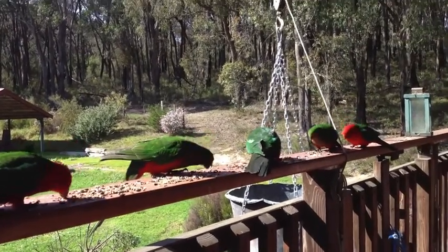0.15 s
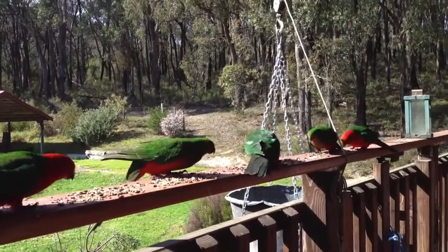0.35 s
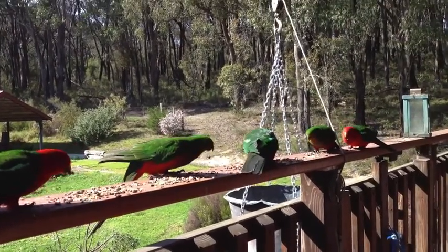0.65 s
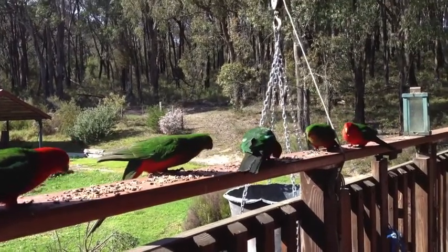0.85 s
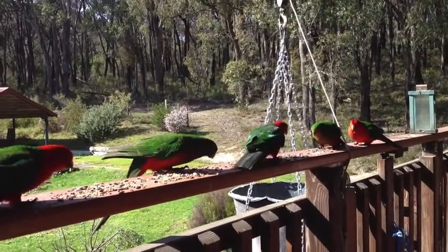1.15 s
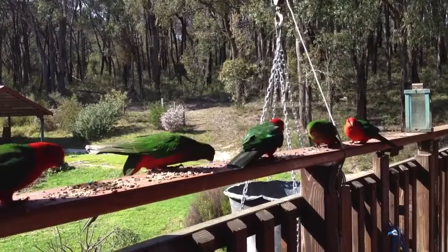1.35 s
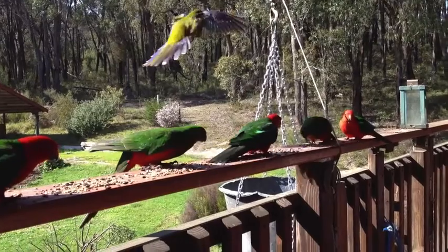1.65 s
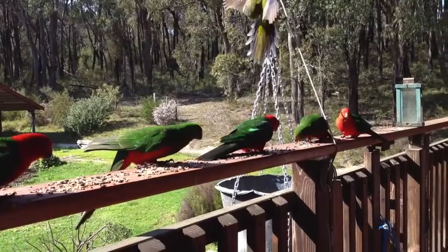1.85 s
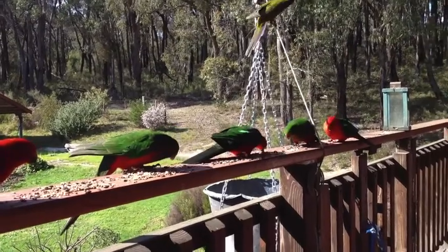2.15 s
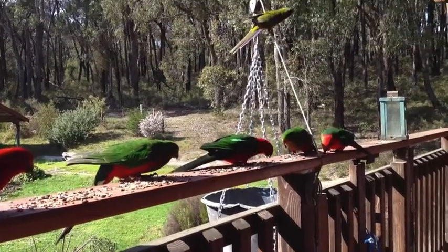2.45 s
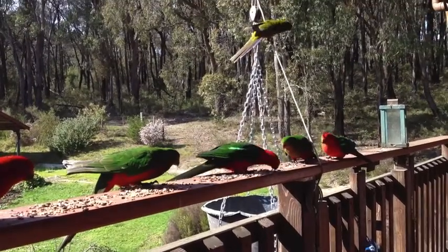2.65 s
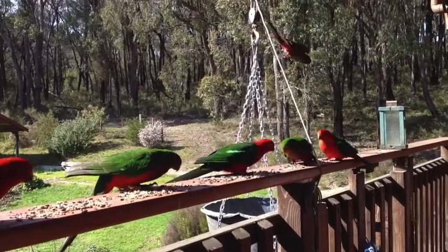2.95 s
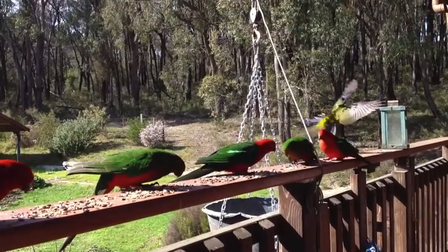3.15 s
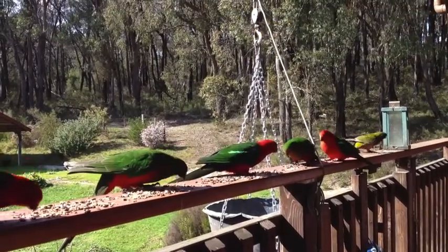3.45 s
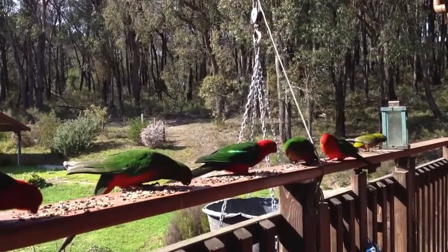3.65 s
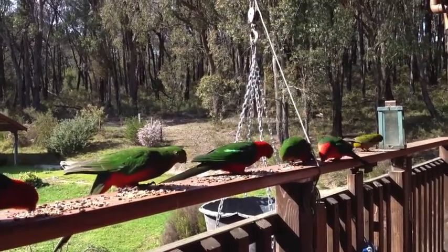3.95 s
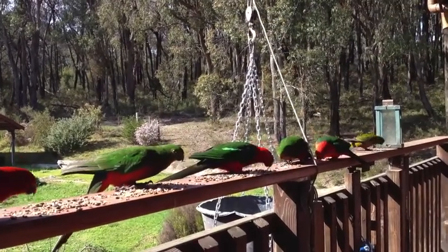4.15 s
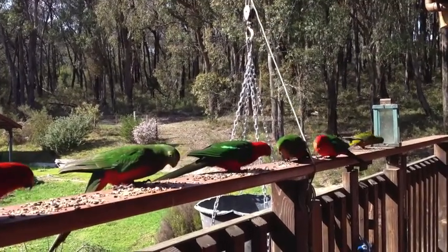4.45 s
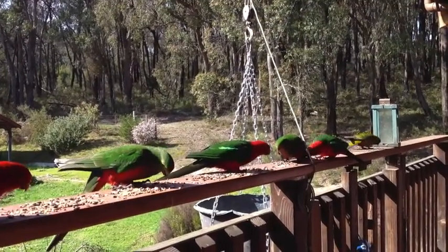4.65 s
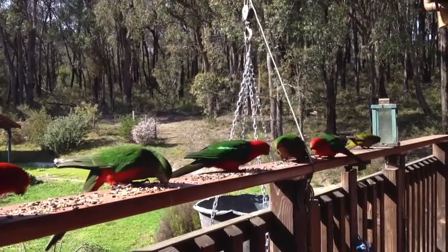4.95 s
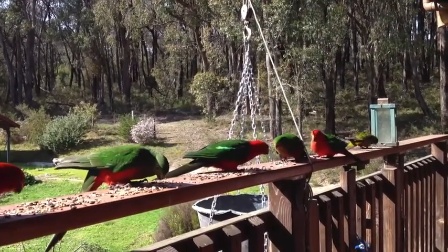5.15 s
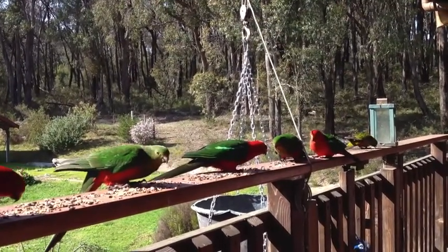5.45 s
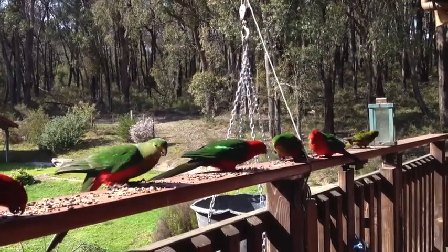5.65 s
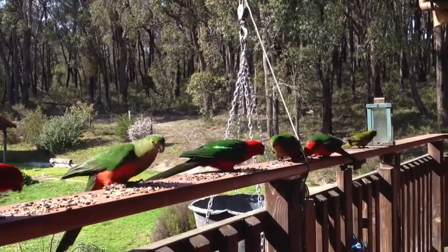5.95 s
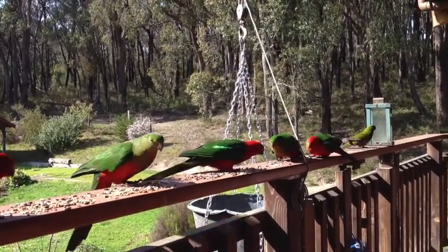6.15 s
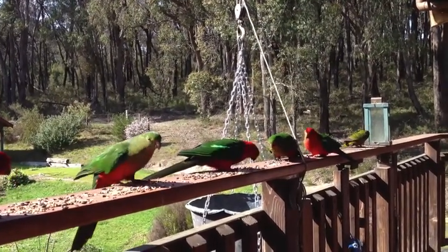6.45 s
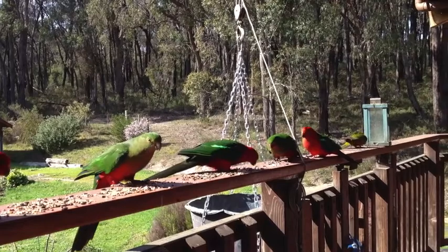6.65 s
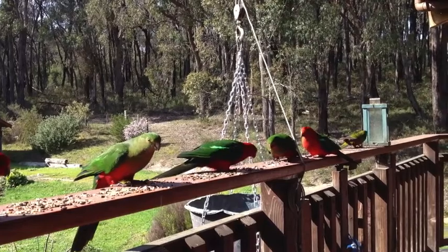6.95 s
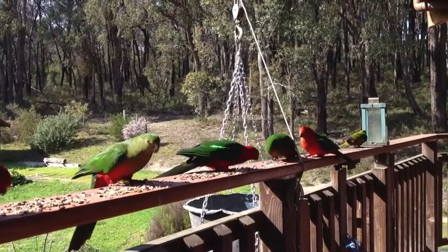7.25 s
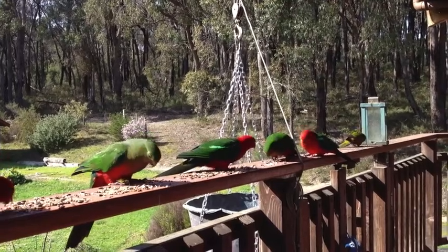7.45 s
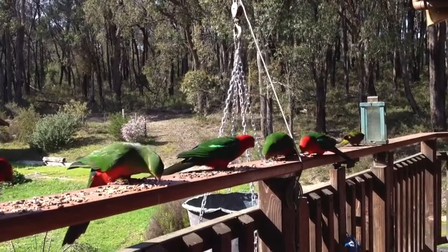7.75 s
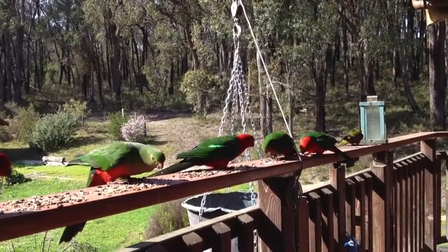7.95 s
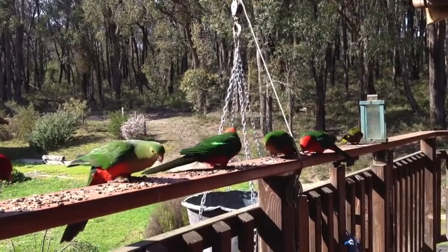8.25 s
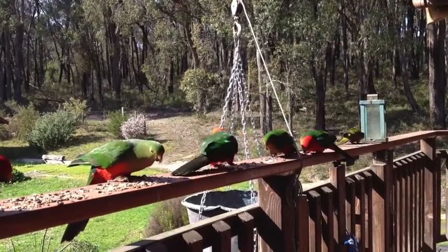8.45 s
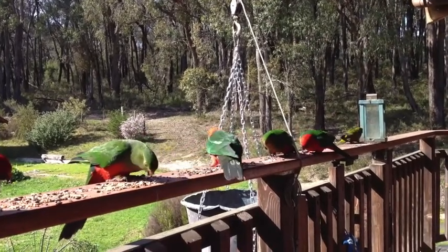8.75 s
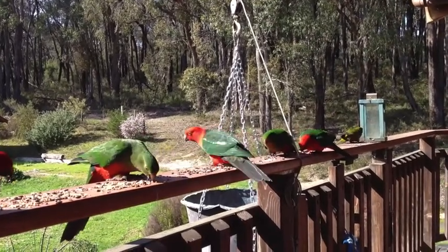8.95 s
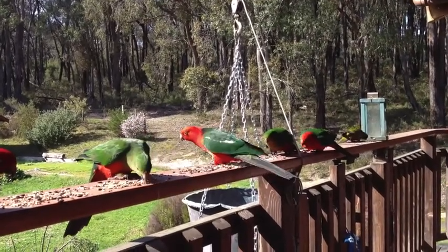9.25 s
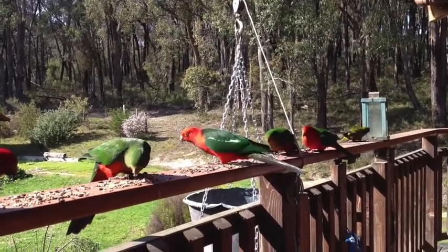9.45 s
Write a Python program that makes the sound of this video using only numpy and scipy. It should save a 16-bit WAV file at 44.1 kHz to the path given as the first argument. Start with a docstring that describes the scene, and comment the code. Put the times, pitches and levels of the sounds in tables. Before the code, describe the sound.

Close outdoor sound of parrots feeding on a wooden railing. Quick hollow beak taps come first, then bright, brittle husk snaps at irregular intervals over gritty seed rustle and tiny ticks. Soft wing beats pass early as another bird flies in, while a small bird twitters nearby. Later, feet shuffle dully on the plank and fluting calls ring from the forest. The background is a very faint airy hush.

```python
"""A wooden veranda at the forest's edge: parrots feed on the railing, and husks snap as bursts through resonances.
Beaks tap a hollow spot, rung as fading sines; loose seed rustles as gritty noise, and flakes of husk tick.
One bird flies in with soft wing beats, another shuffles its feet: both are swells of band-filtered noise.
The timber answers the beaks with short echoes. Small birds whistle behind as gliding sines among the trees,
over a faint hush of coloured noise."""
import sys
import numpy as np
from scipy import signal
from scipy.fft import rfft, irfft, next_fast_len
from scipy.io import wavfile
from scipy.ndimage import uniform_filter1d, map_coordinates

SR = 44100
rng = np.random.default_rng(int(sys.argv[2]) if len(sys.argv) > 2 else 0)


def store_wav(level_fs):
    """Save 16-bit WAV to argv[1]."""
    pcm = np.round(np.clip(np.atleast_2d(level_fs), -1, 1) * 32767)
    wavfile.write(sys.argv[1], SR, pcm.T.astype(np.int16))


N = 422919

# body of a seed husk, its resonances: centre_hz, width_hz, relative level_db
HUSK_MODES = [(3860, 1070, -3.5), (7683, 615, 12.5)]
# the husk's high, splintering resonances: centre_hz, width_hz, relative level_db
SPLINTER_MODES = [(11060, 1200, 4), (13740, 2600, 1)]
# the wooden plank's resonances: centre_hz, width_hz, relative level_db
PLANK_MODES = [(700, 470, -17), (1240, 260, -4), (1530, 286, -3), (1870, 700, -7.5)]


def amp(db):
    """Decibels to gain."""
    return 10 ** (np.asarray(db) / 20)


def unit(x):
    """Scale to rms 1."""
    return x / np.sqrt(np.mean(x ** 2) + 1e-20)


def along(points, hz):
    """Read (Hz, value) points at any frequency, on a log axis."""
    point_hz, values = np.transpose(points)
    return np.interp(np.log(hz + 1), np.log(point_hz + 1), values)


def curves(rows):
    """One value per sample for each column after the time."""
    s, *columns = np.transpose(rows)
    return [np.interp(np.arange(N) / SR, s, column) for column in columns]


def wobble(rate):
    """A smooth random curve with rate knots a second."""
    knots = rng.standard_normal(int(N * rate / SR) + 4)
    return map_coordinates(knots, [np.arange(N) * rate / SR])


def filtered(x, response):
    """x times a complex response of frequency, zero-padded so that its ringing does not wrap round."""
    size = next_fast_len(len(x) + 4096)
    hz = np.fft.rfftfreq(size, 1 / SR)
    return irfft(rfft(x, size) * response(hz), size)[:len(x)]


def resonate(x, modes, stretch=1):
    """x through parallel (Hz, width, dB) resonances of alternating sign, their pitch scaled by stretch."""
    def response(f):
        total = 0
        for k, (centre, width, db) in enumerate(modes):
            peak = 1j * f * width / ((centre * stretch) ** 2 - f * f + 1j * f * width)
            total = total + (-1) ** k * amp(db) * peak
        return total
    return filtered(x, response)


def coloured(x, spectrum):
    """x with a (Hz, dB) spectrum, at rms 1."""
    return unit(filtered(x, lambda hz: amp(along(spectrum, hz))))


def add(track, s, sound):
    """Mix a sound into the track at s seconds."""
    part = track[max(round(s * SR), 0):][:len(sound)]
    part += sound[:len(part)]


def tail(decays, size):
    """A diffuse echo of energy 1; each frequency dies at its own speed."""
    hz, t, z = signal.stft(rng.standard_normal(size), SR, nperseg=256)
    decay = amp(-60 * t / along(decays, hz)[:, None])
    echo = signal.istft(z * decay, SR, nperseg=256)[1]
    return echo / np.linalg.norm(echo)


def burst(envelope, modes, stretch, flatten):
    """A shaped puff of force, its spectrum evened out by flatten (0-1), rings the modes; energy 1."""
    force = rfft(envelope * rng.standard_normal(len(envelope)))
    evened = irfft(force / np.abs(force) ** min(flatten, 1))
    ring = resonate(evened, modes, stretch)
    return ring / np.linalg.norm(ring)


def air(low_db=2.0, forest_db=2, patchy_db=2.5):
    """A low outdoor hush and the faint sough of the forest: coloured noise that swells in patches."""
    # how the background comes and goes, before the trims: time_s, low_hush_level_db, forest_level_db
    air_levels = [(0.0, -73, -72), (1.36, -68.5, -64.5), (1.81, -73, -70), (2.14, -67, -67.5),
                  (2.37, -68.5, -70), (4.35, -68, -70.5), (4.62, -70, -70), (6.57, -69.5, -67),
                  (7.4, -71.5, -70), (9.38, -69.5, -71), (9.59, -71, -68)]
    # colour of the low hush: frequency_hz, relative level_db per Hz
    low_colour = [(20, 5), (50, -5), (85, -7.5), (120, -4), (170, 3), (240, -2), (350, -6), (600, -7.5),
                  (1200, -13.5), (4000, -38)]
    # colour of the forest's sough: frequency_hz, relative level_db per Hz
    forest_colour = [(250, -25), (600, -3.5), (1000, -1), (1450, 0), (2000, -1), (2700, -9.5), (4300, -2.5),
                     (6000, -11.5), (15000, -14)]
    low, forest = curves(air_levels)
    low_swell, forest_swell = 1.4 * wobble(9), wobble(6)  # dB
    hush = amp(low + low_db + low_swell) * coloured(rng.standard_normal(N), low_colour)
    sough = amp(forest + forest_db + forest_swell) * coloured(rng.standard_normal(N), forest_colour)
    z = signal.stft(hush + sough, nperseg=1024)[2]
    # random patches of louder and softer, smooth over both pitch and time
    across_pitch = uniform_filter1d(rng.standard_normal(z.shape), size=7, axis=0)
    patches = uniform_filter1d(across_pitch, size=7, axis=1)
    return signal.istft(z * amp(patchy_db * unit(patches)), nperseg=1024)[1][:N]


def whistles(notes, linger, settle, waver, near_db, echo_db, edge, level_db):
    """Pure notes linger on their start pitch, then slide and settle on the end pitch; trees echo them."""
    # ring of the forest: frequency_hz, time_to_fall_60_db_s
    tree_decays = [(1000, 1.16), (3000, 1.2), (9000, 0.77)]
    out, drift = np.zeros(N), wobble(90)
    for s, length, start_hz, end_hz, db in notes:
        u = np.linspace(0, 1, int(length * SR))
        hz = end_hz + (start_hz - end_hz) * (1 - u ** linger) ** settle
        hz = hz * (1 + waver * np.roll(drift, -int(s * SR))[:len(u)])
        swell = np.abs(np.sin(np.pi * u)) ** edge
        tone = np.sin(2 * np.pi * np.cumsum(hz) / SR)
        add(out, s, amp(db + level_db) * swell * tone)
    near_trunks = amp(near_db) * tail([(3000, 0.083)], size=SR)  # make the notes uneven
    far_trunks = amp(echo_db) * tail(tree_decays, size=SR)  # trail the notes with echo
    return out + signal.fftconvolve(out, near_trunks + far_trunks)[:N]


def songbirds():
    """The twitter is near and fairly dry; the fluting is far, lingers before each slide and rings on."""
    # a small bird twittering close by, level before the trim: start_s, length_s, start_hz, end_hz, level_db
    twitter_notes = [(.853, 0.036, 3700, 4150, -60), (1.205, 0.036, 4550, 4270, -58.5),
                     (1.257, 0.03, 3430, 3700, -63), (1.295, 0.022, 3670, 3940, -59),
                     (1.445, 0.018, 3050, 3105, -60), (1.487, 0.037, 3710, 3100, -59.5),
                     (1.538, 0.014, 2870, 2900, -66), (1.772, 0.056, 3960, 3380, -57),
                     (1.852, 0.074, 3020, 3170, -59), (2.103, 0.019, 3740, 3220, -58),
                     (2.13, .022, 3250, 3480, -55.5), (2.15, 0.043, 3470, 2860, -62),
                     (2.168, 0.035, 3670, 3980, -58), (2.322, 0.053, 3520, 3140, -60.5),
                     (2.406, 0.037, 2990, 3260, -61.5), (2.667, 0.025, 2470, 2345, -59.5),
                     (2.802, 0.046, 2740, 3960, -64), (6.074, .016, 4370, 4600, -52),
                     (6.492, 0.018, 3700, 3260, -62), (6.784, 0.043, 3700, 3480, -57.5),
                     (7.123, 0.039, 3520, 3270, -63), (7.318, 0.028, 3710, 3160, -66)]
    # calls from deep in the forest, level before the trim: start_s, length_s, start_hz, end_hz, level_db
    fluting_notes = [(3.755, 0.095, 9750, 9400, -72), (3.815, 0.09, 8550, 8260, -60),
                     (3.96, 0.087, 8570, 8300, -71), (4.045, 0.16, 8480, 8270, -61.5),
                     (5.1, 0.11, 4100, 3810, -59), (5.185, 0.12, 3700, 2225, -60),
                     (6.925, 0.06, 1793, 1790, -59), (7.388, 0.042, 2700, 1216, -56.5),
                     (7.62, 0.12, 1800, 1744, -64), (7.665, 0.081, 1250, 1860, -61),
                     (7.735, 0.055, 2350, 2920, -63.5), (8.02, 0.051, 1675, 1390, -51.5),
                     (8.167, .05, 3370, 2460, -52.5), (8.208, 0.075, 2080, 1572, -50),
                     (8.374, 0.099, 2494, 2750, -57), (8.433, 0.19, 2738, 2687, -58),
                     (8.745, 0.084, 1605, 958, -63), (9.135, 0.078, 1383, 959, -59),
                     (9.386, 0.096, 1580, 1517, -49), (9.525, 0.043, 1527, 1526, -60),
                     (9.57, 0.045, 2150, 2260, -58.5)]
    near = whistles(twitter_notes, linger=1.057, settle=1.72, waver=0.014,
                    near_db=-2, echo_db=-8.0, edge=0.16, level_db=2.4)
    far = whistles(fluting_notes, linger=1.5, settle=2.1, waver=0.0043,
                   near_db=-4.5, echo_db=-4, edge=0.26, level_db=0.5)
    return near + far


def wings(breadth=0.78):
    """Each stroke is a soft puff of air, a swell of band-filtered noise; a quick downbeat thumps low."""
    # quick downbeats of a wing: centre_s, level_db
    downbeats = [(1.281, -50), (1.359, -53.5), (1.717, -54), (1.826, -59), (2.135, -53.5), (8.487, -54.5)]
    # feathers sweeping the air: centre_s, swell_length_s, centre_hz, level_db
    sweeps = [(1.934, 0.12, 665, -64), (2.002, 0.087, 179, -58), (2.63, 0.031, 635, -57),
              (3.083, 0.069, 1010, -60.5), (4.28, 0.016, 615, -57.5)]
    beat_s, beat_hz = 0.0066, 250  # swell length and centre of each downbeat's thump
    thumps = [(s, beat_s, beat_hz, db) for s, db in downbeats]
    out, t = np.zeros(N), np.arange(-SR // 5, SR // 5) / SR
    for s, length, hz, db in sweeps + thumps:
        swell = np.exp(-2 * (t / length) ** 2)
        band = [(hz, breadth * hz, 0)]
        puff = resonate(resonate(swell * rng.standard_normal(len(t)), band), band)
        add(out, s + t[0], amp(db) * puff * np.linalg.norm(swell) / np.linalg.norm(puff))
    return out


def thuds(hz_spread=1.6):
    """A bird shifts its weight: claws land at once on the plank and scuff to a stop, as dying noise."""
    # feet shuffling on the plank: start_s, dying_away_s (to 1/e), centre_hz, level_db
    steps = [(6.663, 0.078, 345, -55), (6.746, 0.039, 700, -55), (7.066, 0.067, 330, -62),
             (7.19, .022, 580, -54)]
    out, t = np.zeros(N), np.arange(SR // 4) / SR
    for s, length, hz, db in steps:
        scuff = np.exp(-t / length) * amp(2 * wobble(303)[:len(t)])
        band = [(hz, hz_spread * hz, 0)]
        thud = resonate(resonate(scuff * rng.standard_normal(len(t)), band), band)
        add(out, s, amp(db) * thud * np.linalg.norm(scuff) / np.linalg.norm(thud))
    return out


def veranda(x, early_db, tail_db, count=5):
    """Direct sound, a few reflections off the nearby timber, then the roof's short wash."""
    # ring of the roofed space: frequency_hz, time_to_fall_60_db_s
    roof_decays = [(300, 0.061), (1500, 0.2), (7500, 0.13), (14000, 0.14)]
    room = amp(tail_db) * tail(roof_decays, size=8192)
    delays_s = rng.uniform(0.0013, 0.0055, count)
    room[(delays_s * SR).astype(int)] += amp(early_db) * rng.choice([-1, 1], count)
    room[0] += 1
    return signal.fftconvolve(x, room)


def stirring(rake_db=-1, steady_db=-1):
    """Level of the rustle in dB: steady feeding plus the power of a smooth swell for each rake."""
    # how busily seed and feathers are stirred, before the trim: time_s, level_db
    steady_levels = [(0.0, -66.5), (0.43, -63), (0.91, -56), (1.68, -58), (2.03, -64.5), (2.75, -66),
                     (3.04, -61), (3.31, -66), (4.0, -63), (4.81, -67), (5.39, -57), (5.95, -60.5),
                     (6.94, -59), (7.48, -67), (8.14, -67), (8.3, -60), (8.47, -65), (9.59, -62)]
    # a beak or foot rakes through the loose seed, before the trim: centre_s, swell_length_s, level_db
    rakes = [(.8, .09, -54), (1.057, .06, -56.5), (2.63, .05, -62), (3.127, .08, -62), (4.539, .03, -56),
             (5.504, .07, -55.5), (6.491, .05, -57.5), (7.013, .04, -58.5), (8.221, .06, -58),
             (8.425, .05, -61)]
    t = np.arange(N) / SR
    power = amp(curves(steady_levels)[0] + steady_db) ** 2
    for s, length, db in rakes:
        power = power + amp(db + rake_db) ** 2 * np.exp(-2 * ((t - s) / length) ** 2)
    return 10 * np.log10(power)


def scratches(rate, spread_db, life_s, stretch):
    """Tiny scrapes of beak on husk at chance moments, each dying grit; rung by the husk and by the plank."""
    strength = amp(spread_db * np.minimum(rng.standard_exponential(N), 2))
    starts = (rng.random(N) < rate / SR) * strength
    envelope = signal.lfilter([1], [1, -np.exp(-1 / (life_s * SR))], starts)
    grit = veranda(envelope * rng.standard_normal(N), early_db=-15, tail_db=0.5)[:N]
    on_husk = resonate(grit, HUSK_MODES + SPLINTER_MODES, stretch)
    return unit(on_husk), unit(resonate(grit, PLANK_MODES))


def rustle(hiss_db=-0.5, grain_db=-4.5, patter_db=-16, rate=18, spread_db=4, busy_db=-60, thinning=0.017):
    """Stirred seed and feathers hiss; scrapes stand out a little more in calm, some pattering on the plank."""
    # large to small seeds: scrape_dying_away_s (to 1/e), pitch_ratio to the usual husk
    seed_sizes = [(0.0019, 0.83), (0.0026, 0.946), (0.0012, 1.12)]
    # colour of the hissing chaff: frequency_hz, relative level_db per Hz
    chaff_colour = [(1000, -21.5), (2400, -11), (4300, -5.5), (5500, -15), (7900, 1), (9500, -9),
                    (11700, -2), (15400, -10)]
    level_db = stirring()
    layers = [scratches(rate, spread_db, life_s, stretch) for life_s, stretch in seed_sizes]
    grains, patter = np.sum(layers, axis=0)
    grit = amp(3.2 * wobble(700)) * rng.standard_normal(N)  # seeds rub in tiny slips
    flutter_db = 2.6 * wobble(35)
    calm_db = thinning * np.minimum(level_db - busy_db, 0)
    hiss = coloured(grit, chaff_colour) * amp(flutter_db + calm_db)
    patter = unit(patter * amp(5 * wobble(25)))  # the patter comes and goes
    tick_db = level_db - thinning * np.maximum(level_db - busy_db, 0)
    ticks = amp(grain_db) * unit(grains) + amp(patter_db) * patter
    return amp(level_db + hiss_db) * hiss + amp(tick_db) * ticks


def flakes(flake_db=-63, spread_db=3, busy_db=-60):
    """Flakes of husk split off with tiny, dry, bright ticks, more of them while the seed is being stirred."""
    rate = 16 * amp(stirring() - busy_db)  # flakes per second
    out, t = np.zeros(N), np.arange(512) / SR
    snap = np.exp(-((t - .001) / .0001) ** 2)
    for i in np.flatnonzero(rng.random(N) < rate / SR):
        db = flake_db + spread_db * min(rng.standard_exponential(), 2)
        tick = burst(snap, SPLINTER_MODES, rng.uniform(.75, 1.1), flatten=.5)
        add(out, i / SR, amp(db) * np.sqrt(.01 * SR) * tick)  # level over 10 ms
    return veranda(out, early_db=-16, tail_db=-11)[:N]


def taps(tick_s=0.0012):
    """A beak ticks against a hollow spot, a click of noise, and its modes ring for a moment as sines."""
    # hollow beak taps: start_s, ring_gain_db, tick_gain_db
    beak_taps = [(0.084, -79, -47), (0.094, -52.5, -41.5), (0.156, -54.5, -40), (0.225, -60, -39)]
    # modes of the hollow spot: frequency_hz, relative level_db, time_to_fall_60_db_s
    hollow_modes = [(570, -15, 0.27), (1030, 2.5, 0.12), (1630, 0, 0.1), (2390, -31, 0.087),
                    (3790, -9, 0.041)]
    # Hz, relative dB
    tick_colour = [(500, -22), (1500, -1.0), (4000, 1.0), (5500, -4), (8000, 1.0), (15000, -1.5)]
    out, t = np.zeros(N), np.arange(SR // 5) / SR
    for s, ring_db, tick_db in beak_taps:
        ring = np.zeros(len(t))
        for hz, db, t60 in hollow_modes:
            strike_db = db + rng.normal(0, 1.3)  # no two taps excite the modes alike
            ring += amp(strike_db - 60 * t / t60) * np.sin(2 * np.pi * hz * t)
        tick = coloured(rng.standard_normal(len(t)), tick_colour) * np.exp(-t / tick_s)
        add(out, s, amp(ring_db) * ring)
        add(out, s, veranda(amp(tick_db) * tick, early_db=-1.5, tail_db=4.5))
    return out


def nibbles(scatter_db=0.5, husk_hz=7650, pitch_scatter=0.078, colour_db=4):
    """Faint cracks at chance moments, more of them while the seed is stirred; rows like the loud snaps."""
    per_s, level_db, knock_db, splinter_db, smear_db = 1.8, -59.5, -10, 3, 0
    busy = np.cumsum(amp(stirring()))
    count = int(per_s * N / SR)
    shares = (np.arange(count) + rng.random(count)) / count
    times = np.searchsorted(busy, busy[-1] * shares) / SR
    typical = np.array([level_db, husk_hz, knock_db, splinter_db, smear_db])
    scatter = np.array([scatter_db, pitch_scatter * husk_hz, colour_db, colour_db, colour_db])
    return [(s, *(typical + scatter * rng.standard_normal(len(typical)))) for s in times]


def cracks(husk_db=0.0, splinter_db=0, knock_db=0, snap_s=0.0002, snap_scatter=0.29, crumble_s=0.0054,
           crumble_db=-8, chip_db=9, husk_hz=7650, shell_scatter=.035):
    """A husk breaks in a fraction of a millisecond and crumbles in chips, ringing shell and plank."""
    # loud husk snaps: time_s, nominal level_db over 10 ms before echo, husk_pitch_hz (limited to 20 % off usual),
    # plank_knock_db and splinter_db relative to the level, smear_db: more chips and echo after the snap
    snaps = [(0.2742, -55, 7600, -6, -2.0, 7), (0.4613, -30.5, 7390, -14, -9.5, 0.5),
             (0.6212, -52.0, 7720, -28, 0, -7), (0.67, -52.5, 7200, -11, -6.5, -3),
             (0.8872, -45.0, 8120, -16, -2.0, -7), (1.0271, -44, 7590, -19, -6, 2),
             (1.0552, -51, 8150, -2.5, -3.0, 6), (1.1624, -38.5, 7840, -17.0, -5, -1.5),
             (1.299, -47.5, 7400, -4.5, -16, -0.5), (1.405, -49.5, 7400, -10.0, -5, 14),
             (1.4697, -47.5, 7360, -21, -5, -5), (1.4882, -50.5, 7550, -23, -10, 5),
             (1.5796, -47.5, 7600, -14, 7.5, -9), (1.6203, -48.5, 7260, -15, -7, 2),
             (1.6302, -50.5, 7700, -15, -5.5, 1), (1.7454, -48, 7350, -22.5, -16, -8),
             (1.825, -51.5, 7640, -10, 1.5, -8.5), (1.8359, -60, 8180, -18, 9, -11),
             (2.1992, -33.5, 7650, -9.5, -4, -0.5), (2.4685, -53.5, 7300, -7, -13, 6.0),
             (2.6487, -50.5, 7600, -13.0, -2, 1), (2.796, -48.5, 7960, -10.0, -8, -3),
             (2.8967, -37.5, 8400, -32, -8, -6), (2.9135, -45, 6740, -18, -7, -2),
             (2.926, -43, 7900, -22, -6, 1), (3.0459, -56, 8020, 4, -1, 0), (3.0775, -54, 7600, -3, -1, 5),
             (3.171, -56, 7700, -8.5, 2, 1), (3.193, -61, 7900, -9, 3, -10), (3.264, -59, 7250, -1, -3, 6),
             (3.6679, -40.0, 7500, -13.0, -28, -0.5), (4.1473, -55, 7850, -22.0, -0.5, -5),
             (4.1682, -53, 7750, -25, -3, -6), (4.3666, -35.5, 8100, -22, -6.5, -4.5),
             (4.489, -41.5, 8000, -32.5, -7, 1), (4.5058, -34.5, 7700, -13, -11, -2),
             (4.5686, -51.5, 7400, -13, 2, -1), (4.8762, -46, 7140, -16, -1.0, 0),
             (4.9233, -51, 7860, -9.5, -4.0, -5), (5.0361, -38, 7460, -13, 1, -4),
             (5.123, -49.5, 8050, -15.0, 0.0, 1), (5.1675, -36.5, 8000, -17.5, -3.0, -5),
             (5.2688, -54.5, 7650, -0.5, 3.5, 1), (5.3959, -46.5, 7700, -5, 5.5, -3),
             (5.4087, -36.5, 8200, -27, -19, -1), (5.4693, -53.5, 8300, -5.5, 5, 7),
             (5.4995, -50, 7100, -11, -2.5, -5), (5.5604, -44, 8350, -32, -8, -2),
             (5.6085, -46, 7710, -6, -4.5, -4.5), (5.7567, -41, 8150, -35, -4, -4),
             (6.054, -56, 8500, -5, 2, 5), (6.2009, -37, 8200, -19, 0, -5.0),
             (6.4297, -52.5, 8200, -6.5, 4, 6), (6.4661, -50.0, 7500, -12, 2, -5),
             (6.6608, -44.5, 7900, -11, -1, 7.5), (6.7678, -48, 7300, -9.5, -1.5, -4),
             (6.8004, -44, 7400, -14, -6, -2.0), (6.8962, -54.5, 7480, -1.5, 11, -6),
             (6.9554, -49, 7290, -19, -4.5, 7), (7.0523, -40.5, 7450, -11, -2.5, 0),
             (7.064, -35.0, 7440, -10.0, -8.5, -1.5), (7.289, -49, 7600, -16, -0.5, -7),
             (7.479, -54, 6500, -14, 0.5, 9), (7.9056, -48, 7960, -12, -5, -2.5),
             (8.0712, -46.5, 7740, -16, -12, -4), (8.1075, -45, 7740, -18.0, -5, -4),
             (8.1683, -57.5, 8300, -4, 6, -1), (8.2324, -46.5, 7700, -15, -6, 0),
             (8.3783, -54.5, 8040, -16.0, -2.5, -13), (8.4024, -48, 8300, -11.5, -3, 6),
             (8.449, -48.5, 7940, -30.5, -2, -1), (8.4606, -49, 7800, -8, 2.0, -1),
             (8.6617, -53, 7700, -3.5, 4, 6), (8.681, -47, 7160, -16, 0, -2),
             (8.6994, -57, 7100, -4, 9, -10), (8.8706, -37.5, 7550, -14.5, 1, -1),
             (8.9545, -50, 7600, -9, -5, -3.5), (9.0768, -48, 7500, -6, -0.5, -2),
             (9.1562, -46, 8300, -11.0, -6.5, -3), (9.1963, -62.5, 8340, 5.5, 1, -4),
             (9.2642, -57.5, 6870, -18.0, 5.0, 6), (9.4305, -32.5, 7270, -16, -8, 0.5)]
    out = np.zeros(N)
    t = np.maximum(np.arange(1024) / SR - .001, 0)  # 1 ms of stillness ahead of the snap
    chips = amp(chip_db * wobble(1500))
    for s, db, hz, knock, splinter, smear in snaps + nibbles():
        u = t / (snap_s * np.exp(snap_scatter * rng.standard_normal()))
        here = int(s * SR) + np.arange(len(t))
        crumble = (t > 0) * np.exp(-t / crumble_s) * chips.take(here, mode="wrap")
        parts = [(HUSK_MODES, np.clip(hz / husk_hz, .8, 1.2), husk_db),
                 (SPLINTER_MODES, rng.normal(1, shell_scatter), splinter_db + splinter),
                 (PLANK_MODES, rng.normal(1, 0.055), knock_db + knock)]
        click = 0
        for modes, stretch, level in parts:
            sharp = burst(u * np.exp(-u), modes, stretch, flatten=.8)
            ragged = burst(crumble, modes, stretch, flatten=0)
            click = click + amp(db + level) * (sharp + amp(crumble_db + smear) * ragged)
        click = click * np.sqrt(.01 * SR / (1 + amp(smear) ** 2))  # more smear, softer snap
        # a clean snap in a raised beak is dry; a smeared one brings more chips and more echo off the timber
        echoing = veranda(click, early_db=-9 + smear, tail_db=-1.5 + smear, count=3)
        add(out, s - .001, echoing)
    return out


def scene():
    """Everything as heard from the end of the railing, in one channel."""
    background = air() + songbirds()
    birds = wings() + thuds()
    feeding = rustle() + flakes() + taps() + cracks()
    return (background + birds + feeding)[None]


def record(dry, low_cut_hz=140, top_hz=15450):
    """The microphone thins the bass and keeps nothing above its band limit."""
    thin = signal.sosfilt(signal.butter(2, low_cut_hz, "high", fs=SR, output="sos"), dry)
    return np.array([filtered(x, lambda hz: hz < top_hz) for x in thin])


dry = scene()
out = record(dry)
store_wav(out)
```